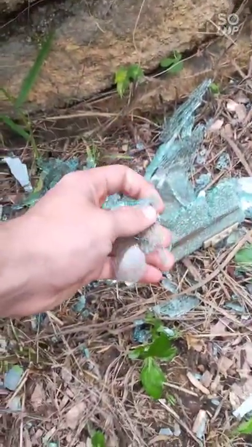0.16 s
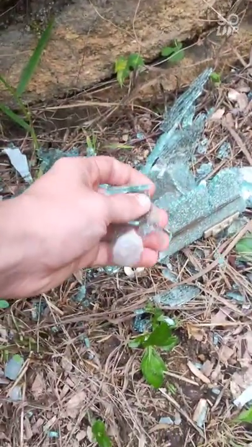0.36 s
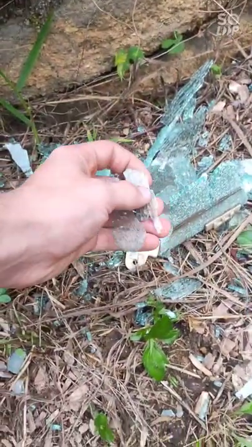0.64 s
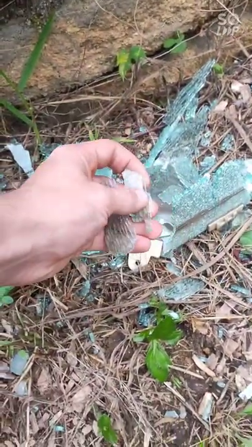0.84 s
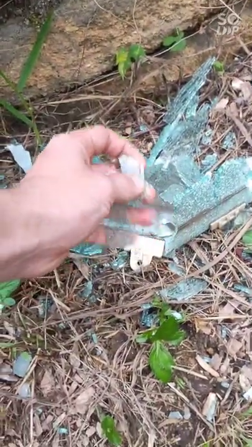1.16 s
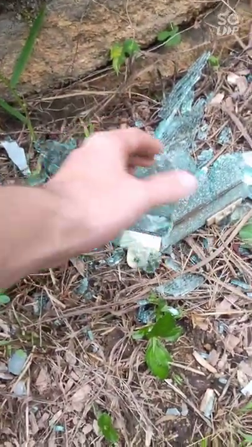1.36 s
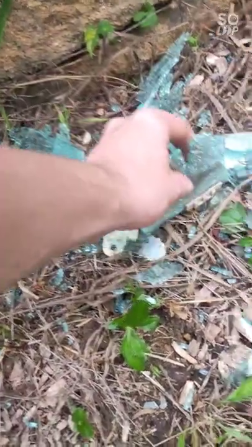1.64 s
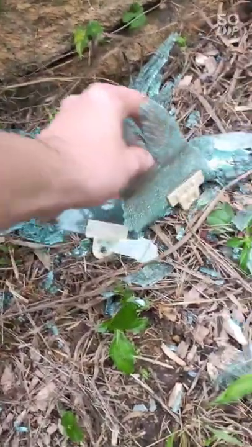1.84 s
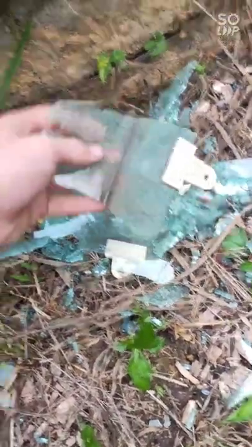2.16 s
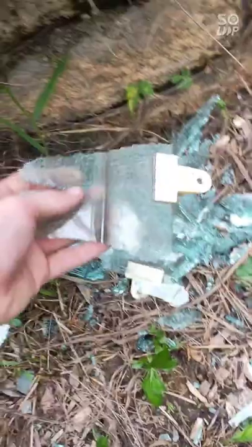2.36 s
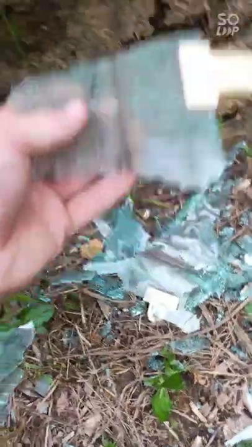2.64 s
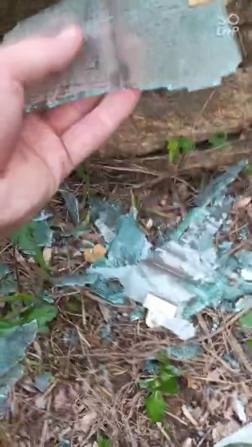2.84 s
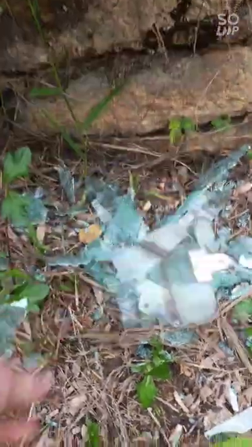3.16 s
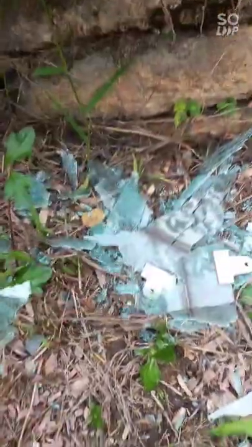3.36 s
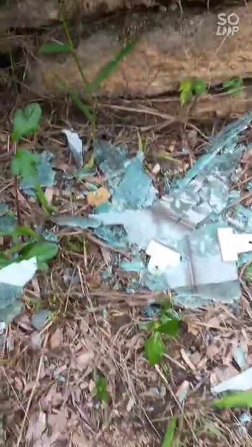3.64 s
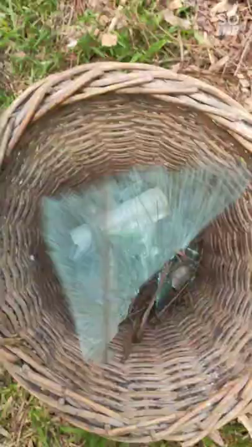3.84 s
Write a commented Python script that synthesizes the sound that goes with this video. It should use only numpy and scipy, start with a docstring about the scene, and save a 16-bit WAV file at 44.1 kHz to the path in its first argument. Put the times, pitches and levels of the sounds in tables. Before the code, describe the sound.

Broken glass clicks and crunches softly in a hand, close by, for the first 1.3 seconds. Around 1.4 seconds the shards drop clinking onto a pile. A cracked piece is pulled out with a light crunch near 2 seconds and ticks faintly while held. At about 3.3 seconds it lands with one short crash, the loudest sound, and crumbs tinkle and settle. Faint outdoor hiss and microphone rumble lie underneath.

```python
"""Broken safety glass, handled close by, outdoors at the foot of a rock wall.
Shards click and grind in a hand and drop onto the pile. A cracked pane is pulled out, ticks as it is
held, and is thrown back with one short crash; crumbs scatter and settle. Each contact is a volley of
tiny fractures that rings the modes of the glass. Ground, rock and trees return a short echo.
Air hiss and microphone rumble lie underneath."""
import sys
import numpy as np
from scipy import signal
from scipy.fft import rfft, irfft
from scipy.io import wavfile

SR = 44100
rng = np.random.default_rng(int(sys.argv[2]) if len(sys.argv) > 2 else 0)


def wav_out(sig):
    """Save sig, one row per channel (or a flat mono array), as 16-bit PCM at SR to the path in sys.argv[1]."""
    wavfile.write(sys.argv[1], SR, np.round(np.clip(np.atleast_2d(sig).T, -1, 1) * 32767).astype(np.int16))


N = 176400
T = np.arange(N) / SR
BIN_HZ = np.arange(N // 2 + 1) * SR / N
SIDE = np.array([[1], [-1]])   # left, right


def from_db(db):
    """Decibels to gain."""
    return 10 ** (np.asarray(db) / 20)


def unit_rms(x):
    """Scale to an RMS of one."""
    return x / np.sqrt(np.mean(x ** 2) + 1e-30)


def envelope(rows):
    """Gain along a level curve, silent outside it."""
    return from_db(np.interp(T, *np.transpose(rows), left=-140, right=-140))


def at_hz(points, hz):
    """Interpolate on a log-frequency axis."""
    freqs, values = np.transpose(points)
    return np.interp(np.log(hz + 1e-3), np.log(freqs), values)


def pan(left_db):
    """Constant-power gains, left over right by left_db."""
    return unit_rms(from_db(SIDE * left_db / 2))


def bandpass(x, edges_hz):
    """Causal band-pass."""
    return signal.sosfilt(signal.butter(2, edges_hz, "band", fs=SR, output="sos"), x)


def add(out, start_s, x):
    """Mix in a short sound."""
    i = max(int(start_s * SR), 0)
    out[:, i:i + x.shape[1]] += x[:, :N - i]


def stereo(two, correlation):
    """Mix two independent signals into a correlated left and right."""
    correlation = np.clip(correlation, -.99, .99)
    return np.sqrt(1 + correlation) * two[0] + np.sqrt(1 - correlation) * two[1] * SIDE


# Four bands. Each row: low edge in Hz, high edge in Hz.
BANDS_HZ = [(700, 2000), (1800, 5000), (5000, 10000), (9500, 14500)]
# Microphone imbalance. Each entry: left over right in dB for one band.
BAND_PAN_DB = [3, 10, -4.5, 0.5]
# Each entry: left-right correlation for one band.
BAND_CORRELATION = [0.72, .05, 0.73, 0.37]


def by_band(values, hz):
    """Interpolate per-band values between band centres."""
    centres_hz = np.sqrt(np.prod(BANDS_HZ, axis=1))
    return at_hz(list(zip(centres_hz, values)), hz)


def stereo_sine(hz, t):
    """One mode at two microphones, differing in level and phase."""
    phase = np.arccos(np.clip(by_band(BAND_CORRELATION, hz), -1, 1))
    return np.sin(2 * np.pi * hz * t + np.array([[phase], [0]])) * pan(by_band(BAND_PAN_DB, hz))


def resonate(x, modes, direct_db, damping=1):
    """The bare crack plus the modes it excites; damping multiplies their widths."""
    out = from_db(direct_db) * x
    for k, (hz, width_hz, db) in enumerate(modes):
        r = np.exp(-np.pi * width_hz * damping / SR)
        feedback = [1, -2 * r * np.cos(2 * np.pi * hz / SR), r * r]
        ring = signal.lfilter([(1 - r * r) / 2, 0, (r * r - 1) / 2], feedback, x)
        out = out + (-1) ** k * from_db(db) * ring
    return out


def fragment(x, count=9, low_hz=3500, high_hz=15000, width_hz=68, gain_db=4.5):
    """Each fragment has its own shape, so its own sharp, high modes."""
    pitches_hz = low_hz + (high_hz - low_hz) * (np.arange(count) + rng.random(count)) / count
    return resonate(x, [(hz, width_hz, gain_db) for hz in pitches_hz], direct_db=-57)


def contacts(rows, modes, attack_s, decay_s, snap, direct_db, damping, decorrelation,
             spread_db, fragment_db, detune):
    """A snap and a dying volley of fractures ring a slightly different piece at each contact."""
    snap_s, onset_s, mode_spread_db = 0.00096, .006, 4
    t = np.arange(SR // 12) / SR
    noise = rng.standard_normal((len(rows), 3, len(t)))
    volley = (np.exp(-t / decay_s) + snap * np.exp(-t / snap_s)) * (1 - np.exp(-t / attack_s))
    cracks = noise[:, :2] * from_db(spread_db * np.clip(noise[:, 2:], -2, 2)) * volley
    shapes = rng.uniform(-1, 1, (len(rows), len(modes), 2))
    out = np.zeros((2, N))
    for (start_s, *levels_db, pan_db), crack, shape in zip(rows, cracks, shapes):
        piece = [(hz * (1 + detune * shift), width_hz, db + mode_spread_db * boost)
                 for (hz, width_hz, db), (shift, boost) in zip(modes, shape)]
        ring = resonate(crack, piece, direct_db, damping) + from_db(fragment_db) * fragment(crack)
        for k, edges_hz in enumerate(BANDS_HZ):
            part = bandpass(bandpass(ring, edges_hz), edges_hz)
            part = stereo(part, BAND_CORRELATION[k] - decorrelation) * pan(pan_db + BAND_PAN_DB[k])
            onset_rms = np.sqrt(np.mean(part[:, :int(onset_s * SR)] ** 2))
            add(out, start_s, part * from_db(levels_db[k]) / onset_rms)
    return out


def crunch(curve, spectrum, grains_per_s, spread_db, grain_s, hiss, tinkle):
    """Grit breaks in uneven grains, each chinking one of six fragments, over thin hiss."""
    breaks = rng.random(N) < grains_per_s / SR
    sizes = breaks * from_db(spread_db * np.minimum(rng.exponential(1, N), 3))
    power = signal.lfilter([1], [1, -np.exp(-1 / (grain_s * SR))], sizes ** 2 + 1e-12)
    noise = stereo(rng.standard_normal((2, N)), .35)
    struck = rng.integers(0, 6, N)
    chinks = sum(fragment(sizes * (struck == k) * np.sign(noise) + 1e-12) for k in range(6))
    grains = noise * (unit_rms(np.sqrt(power)) + hiss) + tinkle * unit_rms(chinks)
    pan_db = by_band(BAND_PAN_DB, BIN_HZ) + 2.5
    colour = from_db(at_hz(spectrum, BIN_HZ) + SIDE * pan_db / 2)
    coloured = irfft(rfft(grains) * colour, N)
    return envelope(curve) * unit_rms(bandpass(coloured, (800, 18000)))


# Air and rumble envelopes. Each row: time in seconds, level in dB.
AIR_DB = [(0, -67), (1.3, -66.5), (2.3, -66.5), (3.2, -65), (3.6, -66.5), (4, -72)]
RUMBLE_DB = [(0, -67), (.2, -57.5), (.32, -61), (.41, -51), (.52, -51.5), (.65, -64), (.9, -65.5),
             (1.03, -58), (1.2, -65.5), (1.5, -66.5), (1.68, -52.5), (1.85, -65), (2.2, -60), (2.7, -69.5),
             (2.92, -57), (3.2, -65.5), (3.85, -76.5), (4, -63.5)]
# Their spectra. Each row: frequency in Hz, relative level in dB.
AIR_SPECTRUM = [(41, -16), (70, -2), (100, 1.5), (118, -4), (185, -7), (217, -7.5), (467, -7.5),
                (523, -8.5), (751, -12), (1480, -13.5), (2320, -9), (2540, -14), (4580, -19), (7350, -16),
                (9220, -27), (13200, -26), (15500, -34.5)]
RUMBLE_SPECTRUM = [(10, -5), (18, 1), (30, -16), (48, -14.5), (80, -26.5), (160, -61)]
# Air width. Each row: frequency in Hz, left-right correlation.
AIR_CORRELATION = [(60, 0.99), (150, 0.79), (380, 0.56), (950, 0.02), (2380, -0.58), (5980, -0.12),
                   (15000, 0.6)]
# Air balance. Each row: frequency in Hz, left over right in dB.
AIR_PAN_DB = [(60, 3.5), (130, 7.5), (290, 6.5), (640, 6.5), (1410, 6.5), (3100, 11), (6820, -2.5),
              (15000, 2.0)]


def air_and_rumble():
    """Soft hiss of open air; low rumble on the hand-held microphone."""
    hiss = stereo(rfft(rng.standard_normal((2, N))), at_hz(AIR_CORRELATION, BIN_HZ))
    hiss *= from_db(at_hz(AIR_SPECTRUM, BIN_HZ) + SIDE * at_hz(AIR_PAN_DB, BIN_HZ) / 2)
    rumble = stereo(rfft(rng.standard_normal((2, N))), 0.71)
    rumble *= from_db(at_hz(RUMBLE_SPECTRUM, BIN_HZ)) * (BIN_HZ > 10)
    return (envelope(AIR_DB) * unit_rms(irfft(hiss, N))
            + envelope(RUMBLE_DB) * unit_rms(irfft(rumble, N)) * pan(left_db=6))


# Grinding envelope. Each row: time in seconds, level in dB.
GRIND_DB = [(0, -76.5), (.17, -79), (.22, -69.5), (.27, -68), (.35, -66), (.45, -72), (.51, -62.5),
            (.56, -65.5), (.65, -63), (.72, -67), (.76, -58), (.81, -51), (.86, -74.5), (1.0, -67),
            (1.04, -54.5), (1.09, -67.5), (1.14, -61.5), (1.2, -63.5), (1.3, -71.5)]
# Its spectrum. Each row: frequency in Hz, relative level in dB.
GRIND_SPECTRUM = [(350, -12), (600, -6), (1580, -7.5), (2040, -17.5), (3200, -8), (3610, -8.5),
                  (5290, -11.5), (6150, -6), (8870, -7.5), (9630, -13.5), (10300, -13.5), (14000, -17),
                  (15500, -13)]


def hand_grind():
    """Glass grit crunches as the hand moves."""
    return crunch(GRIND_DB, GRIND_SPECTRUM, grains_per_s=220, spread_db=11.5, grain_s=0.0037,
                  hiss=0.38, tinkle=0.83)


# Clicks. Each row: start in seconds, level in dB in each of four bands, leftward pan in dB.
HAND_CONTACTS = [(0.0913, -92, -83, -63.5, -62, 0), (0.144, -73, -69, -61.5, -61, 0),
                 (0.1695, -84, -75, -59.5, -60, -1), (0.1898, -66, -61, -52, -49.5, 1),
                 (0.2529, -70.5, -70, -56, -59, 5), (0.4106, -84, -62, -57, -67, 0),
                 (0.4621, -86, -65, -59.5, -62.5, 2), (0.5354, -78, -57, -62, -62, -1),
                 (0.6055, -66.5, -81, -54, -59, 7), (0.6627, -73, -54.5, -56, -62.5, 5),
                 (0.6945, -76, -60, -66, -62, 11), (0.7129, -54.5, -39.5, -40, -51.5, 1),
                 (0.7273, -61, -69, -70, -76.0, -5), (0.7724, -57.5, -60.5, -59, -66, 0),
                 (0.7776, -72, -56, -56, -72, 5), (0.8143, -81, -58.5, -56.5, -75, 3),
                 (0.9367, -60, -50.5, -47, -51, -1.5), (1.017, -80, -63, -53, -55, 3),
                 (1.0208, -56, -49, -41.5, -50, 7), (1.0322, -72, -47, -41, -56, 2),
                 (1.0576, -77, -56.5, -55, -80, 4.0), (1.1159, -79, -68, -56.5, -57.5, 3.0),
                 (1.133, -58.5, -67, -55.5, -66, 5), (1.322, -85, -64, -63, -71, 3),
                 (1.3543, -85, -59, -52.5, -59, 5), (1.3628, -90, -54.5, -40.5, -51, 8)]
# Shard modes. Each row: frequency in Hz, base width in Hz, gain in dB.
HAND_MODES = [(2270, 98, -3), (2960, 56, 2.5), (4490, 150, -5), (6010, 350, 7.5), (7330, 360, 8),
              (10350, 460, -2), (13200, 660, -15)]


def hand_clicks():
    """Shards snap against each other in the hand."""
    return contacts(HAND_CONTACTS, HAND_MODES, attack_s=0.00038, decay_s=0.0032, snap=1.4, direct_db=-7,
                    damping=0.81, decorrelation=0.02, spread_db=3.5, fragment_db=-2.5, detune=0.065)


# Ringing shards. Each row: start in seconds, pitch in Hz, main mode level in dB, T60 in seconds.
SHARD_PINGS = [(.253, 3700, -49, 0.028), (.535, 3590, -51, 0.064), (.606, 6030, -47.5, 0.028),
               (.695, 3580, -51, 0.049), (0.7133, 4490, -28.5, 0.015), (0.7135, 7200, -28.5, 0.0088),
               (.937, 7080, -36.5, 0.03), (1.033, 2250, -54, 0.074), (1.322, 3660, -60, 0.43),
               (1.322, 6430, -60, 0.23), (1.363, 7200, -34.5, 0.037), (1.386, 7270, -52, 0.067),
               (1.409, 2760, -29, 0.041), (1.409, 870, -36.5, 0.056), (1.449, 830, -40, 0.027),
               (1.455, 3400, -46, 0.048), (1.485, 8730, -39.5, 0.031), (2.083, 2370, -49.5, 0.025),
               (3.271, 7085, -22.5, 0.023), (3.271, 1061, -23, 0.024), (3.358, 13800, -51, .03),
               (3.401, 15100, -48, .03)]


def shard_pings(twin_gain=0.43, twin_offset=0.023, attack_s=0.00015):
    """A loose shard rings on in a close pair of modes."""
    out, t = np.zeros((2, N)), np.arange(SR // 4) / SR
    for start_s, hz, db, t60_s in SHARD_PINGS:
        twin_hz = hz * (1 + twin_offset * rng.uniform(.5, 1.5))
        tone = stereo_sine(hz, t) + twin_gain * stereo_sine(twin_hz, t)
        add(out, start_s, tone * from_db(db - 60 * t / t60_s) * (1 - np.exp(-t / attack_s)))
    return out


# Scrapes. Each row: start in seconds, length in seconds, base pitch in Hz, base level in dB.
EDGE_SCRAPES = [(0.261, .06, 9500, -62), (0.37, 0.11, 9350, -70), (1.785, 0.02, 10050, -54),
                (1.499, .03, 8730, -52), (1.524, 0.03, 7120, -46), (2.042, 0.03, 3340, -57),
                (2.047, .04, 2330, -58)]


def edge_scrapes(slips_per_s=70, rise_s=.001):
    """Edge slips over edge in jerks, each a brief tone of its own strength and pitch."""
    out, t = np.zeros((2, N)), np.arange(SR // 40) / SR
    pulse = t / rise_s * np.exp(1 - t / rise_s)
    for start_s, length_s, hz, db in EDGE_SCRAPES:
        slips = rng.uniform(-0.17, 0.74, (40, 3))
        count = max(round(length_s * slips_per_s), 1)
        for k, (late, force, bend) in enumerate(slips[:count]):
            slip = stereo_sine(hz * (1 + .025 * bend), t) * pulse * from_db(db + 15 * force)
            add(out, start_s + (k + late + .5) / slips_per_s, slip)
    return out


# Tumbling envelope. Each row: time in seconds, level in dB.
TUMBLE_DB = [(1.31, -69), (1.36, -72.5), (1.44, -57), (1.46, -46.5), (1.5, -53), (1.54, -48), (1.58, -69.5),
             (1.594, -43), (1.61, -49.5), (1.66, -56.5), (1.7, -64), (1.78, -69)]
# Its spectrum. Each row: frequency in Hz, relative level in dB.
TUMBLE_SPECTRUM = [(290, -50), (500, -5), (666, -17), (1100, 1.5), (1470, -15), (1880, -4.5), (2130, -12),
                   (3430, -5.5), (5130, -12), (7030, -4), (11800, -17.5), (14500, -8.5), (15500, -22)]


def pile_tumble():
    """Grit crunches under the tumbling handful."""
    return crunch(TUMBLE_DB, TUMBLE_SPECTRUM, grains_per_s=350, spread_db=4.5, grain_s=0.0022,
                  hiss=0.35, tinkle=.9)


# Landings. Each row: start in seconds, level in dB in each of four bands, leftward pan in dB.
PILE_CONTACTS = [(1.409, -44, -39, -41, -45.5, 6), (1.4137, -40.5, -38, -59, -51, 1),
                 (1.4487, -38.5, -41, -42, -35.5, 3), (1.455, -57, -46, -54.0, -52, 5),
                 (1.4805, -48, -47, -53, -60, -6), (1.4844, -59, -50, -48, -57, -4),
                 (1.5083, -50.5, -42, -54, -60, -1), (1.5248, -53.5, -50.5, -62, -54, 3),
                 (1.566, -82, -57, -49.5, -55, 4), (1.5962, -46, -52, -47, -50, 4.5),
                 (1.6539, -58, -70, -52.5, -64, 1.5)]
# Pile modes. Each row: frequency in Hz, base width in Hz, gain in dB.
PILE_MODES = [(950, 240, -7.5), (1917, 33, 2), (3416, 56, 3.5), (5900, 200, 6.5), (6350, 130, 1),
              (7140, 79, 12.5), (8730, 96, 7), (10340, 60, 3), (10900, 290, -10)]


def pile_hits():
    """The handful lands and rings the glass of the pile."""
    return contacts(PILE_CONTACTS, PILE_MODES, attack_s=0.00014, decay_s=0.0039, snap=1.8, direct_db=-7,
                    damping=0.96, decorrelation=0.034, spread_db=4, fragment_db=-27, detune=0.0287)


# Lifting envelope. Each row: time in seconds, level in dB.
LIFT_DB = [(1.78, -70), (1.8, -66), (1.86, -69.5), (1.91, -66), (1.945, -62), (2.03, -62), (2.08, -61),
           (2.19, -72), (2.4, -75), (3.2, -74.5)]
# Its spectrum. Each row: frequency in Hz, relative level in dB.
LIFT_SPECTRUM = [(410, -51), (700, -20), (1130, -6), (2080, -10), (2400, -3.5), (2800, -12), (3320, -3.5),
                 (3580, -7.5), (5150, -11.5), (7030, -6.5), (15500, -19.5)]


def pane_lift():
    """Grit crunches as the pane is pulled out and held."""
    return crunch(LIFT_DB, LIFT_SPECTRUM, grains_per_s=290, spread_db=1, grain_s=.0013,
                  hiss=0.39, tinkle=.7)


# Ticks. Each row: start in seconds, level in dB in each of four bands, leftward pan in dB.
TICK_CONTACTS = [(1.7898, -92, -65, -60.5, -74, 4), (1.8231, -81, -78, -60.5, -75, 4),
                 (1.9356, -88, -64, -57.5, -91, -8), (2.0044, -75, -62, -67, -74, -7),
                 (2.0829, -66, -74, -80, -74, 2), (2.2766, -82, -71, -68, -74, -4),
                 (2.3954, -84, -71, -66.5, -67, -1), (2.4773, -76, -67, -65.5, -67, 2.0),
                 (2.5326, -81, -83, -70, -65, 0), (2.7273, -75, -75, -60, -65, 6),
                 (2.9136, -83, -79, -72, -75, 2), (3.3801, -58.5, -75, -62, -46.5, 3),
                 (3.4005, -67, -68, -65, -60, 5), (3.4771, -85, -71, -71, -76, 1),
                 (3.593, -82, -79, -77, -70.5, 3)]
# Pane modes. Each row: frequency in Hz, base width in Hz, gain in dB.
PANE_MODES = [(1065, 89, 4.5), (1310, 63, 1.5), (1590, 83, -6), (2330, 87, -1.5), (2623, 60, -8.5),
              (3040, 77, 3), (3530, 69, -0.5), (4070, 41, 3.5), (5540, 50, -11.5), (6030, 50, -7),
              (6810, 98, 2), (7060, 60, 1.5), (7350, 54, -2), (8100, 65, 2.5), (8650, 57, -3),
              (11750, 26, -3.5)]


def pane_ticks():
    """Cracks shift in the held pane; after the crash, crumbs land."""
    return contacts(TICK_CONTACTS, PANE_MODES, attack_s=0.00041, decay_s=0.0031, snap=1.7, direct_db=-11,
                    damping=1.2, decorrelation=-0.17, spread_db=4, fragment_db=-5, detune=0.095)


def ground_thud(start_s=3.2715, hz=193, t60_s=0.016, lead_s=0.012):
    """A brief hiss leads into the crash; the soil gives under the pane with a puff of crushed leaves."""
    out, t = np.zeros((2, N)), np.arange(SR // 10) / SR
    leaves = bandpass(rng.standard_normal(len(t)), (150, 500)) * from_db(-24 - 60 * t / 0.025)
    soil = np.sin(2 * np.pi * hz * t) * from_db(-37 - 60 * t / t60_s)
    add(out, start_s, (soil + leaves) * pan(left_db=0.96))
    lead_hiss = unit_rms(bandpass(stereo(rng.standard_normal((2, len(t))), .5), (1200, 9000)))
    gate = (1 - np.exp(-t / 0.0013)) * (t < lead_s)
    add(out, start_s - lead_s, lead_hiss * from_db(-43.5) * gate)
    return out


# Impacts. Each row: start in seconds, level in dB in each of four bands, leftward pan in dB.
CRASH_CONTACTS = [(3.2632, -40.5, -28, -31.5, -37.5, 1.2), (3.2658, -40.5, -24.5, -22.5, -35, 1.2),
                  (3.2706, -29.5, -25, -23.5, -31.5, 1.1), (3.278, -43, -37, -36.5, -44, 2),
                  (3.292, -50, -51, -42.5, -53, 1)]


def pane_crash():
    """The pane lands on its edge, buckles, slaps flat and rocks."""
    return contacts(CRASH_CONTACTS, PANE_MODES, attack_s=0.0016, decay_s=0.002, snap=0, direct_db=-12.5,
                    damping=1.7, decorrelation=0.1, spread_db=3.5, fragment_db=-6.5, detune=0)


# Scattering envelope. Each row: time in seconds, level in dB.
SCATTER_DB = [(3.272, -25.5), (3.3, -45), (3.33, -53), (3.382, -48), (3.42, -58), (3.46, -65), (3.51, -65),
              (3.55, -85), (3.7, -99)]
# Its spectrum. Each row: frequency in Hz, relative level in dB.
SCATTER_SPECTRUM = [(290, -55), (500, -23.5), (620, -9.5), (1120, -1.5), (1330, -8.5), (1450, 2.5),
                    (1960, -9.5), (2390, -6.5), (5200, -5.5), (6830, 0.5), (10000, -6.5), (14800, -5.5)]


def crumb_scatter():
    """Crumbs spray from the crash and settle."""
    return crunch(SCATTER_DB, SCATTER_SPECTRUM, grains_per_s=600, spread_db=1, grain_s=0.0012,
                  hiss=1, tinkle=1.1)


def echo(x):
    """Quick scatter from ground and rock, then a faint tail from the trees."""
    t = np.arange(SR // 2) / SR
    response = 0
    for t60_s, db, delay_s in ((0.12, -18.5, .005), (0.29, -28.5, .02)):
        tail = rng.standard_normal((2, len(t))) * from_db(-60 * t / t60_s) * (t > delay_s)
        response = response + from_db(db) * unit_rms(tail) / np.sqrt(len(t))
    return signal.fftconvolve(x, bandpass(response, (300, 13000)), axes=1)[:, :N]


def scene():
    """Glass contacts and grit with their echo, in open air."""
    hits = hand_clicks() + pile_hits() + pane_ticks() + pane_crash()
    direct = hits + shard_pings() + edge_scrapes() + ground_thud()
    direct += hand_grind() + pile_tumble() + pane_lift() + crumb_scatter()
    return direct + echo(direct) + air_and_rumble()


def record(dry):
    """Steep low-pass."""
    cutoff_hz = 15450
    return signal.sosfilt(signal.ellip(10, .2, 70, cutoff_hz, fs=SR, output="sos"), dry)


dry = scene()
out = record(dry)
wav_out(out)
```